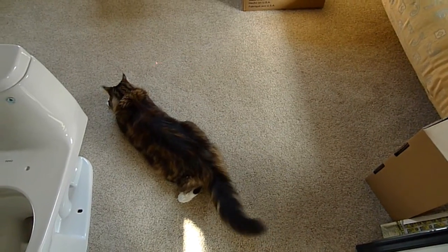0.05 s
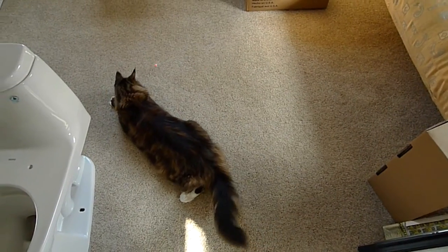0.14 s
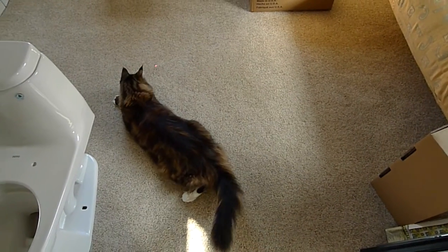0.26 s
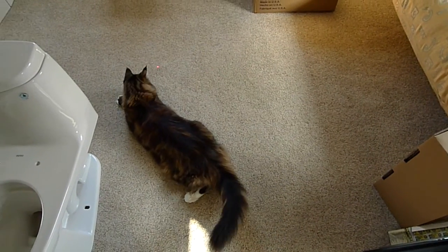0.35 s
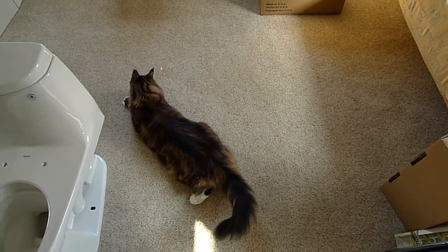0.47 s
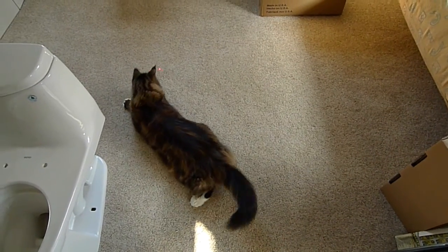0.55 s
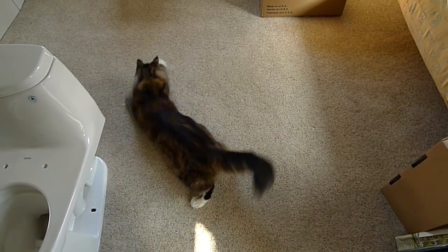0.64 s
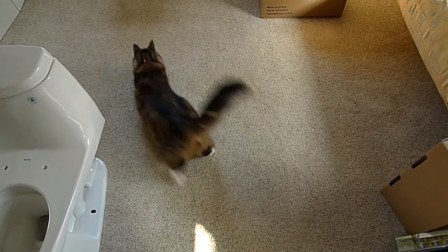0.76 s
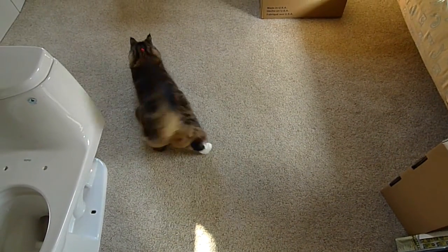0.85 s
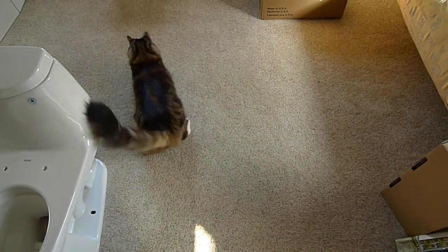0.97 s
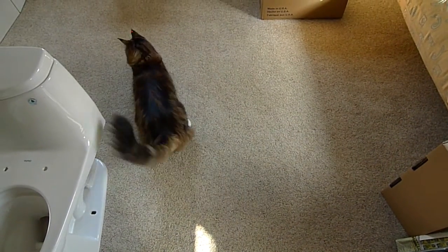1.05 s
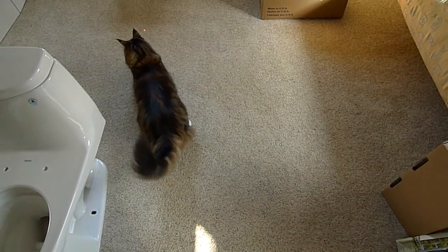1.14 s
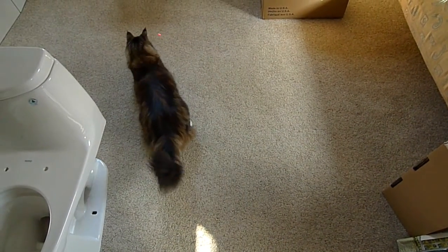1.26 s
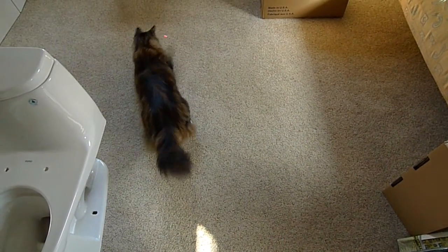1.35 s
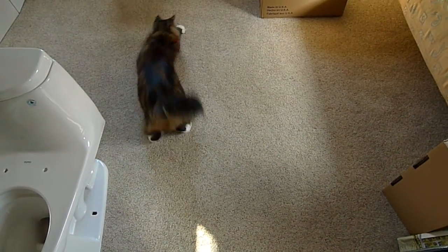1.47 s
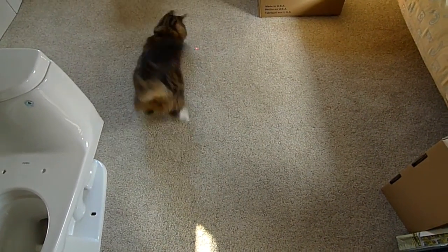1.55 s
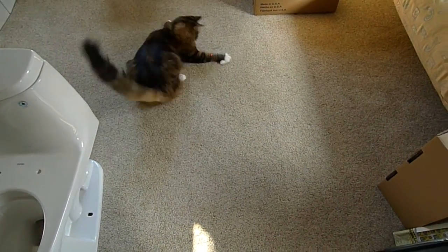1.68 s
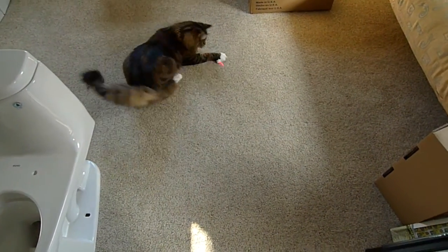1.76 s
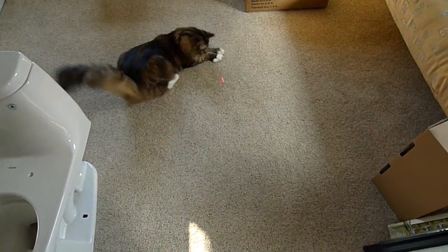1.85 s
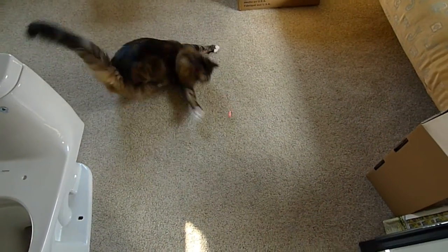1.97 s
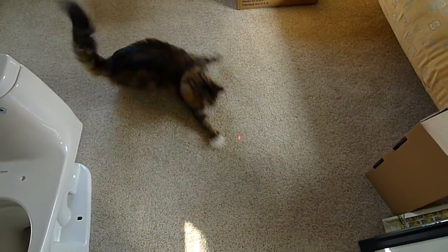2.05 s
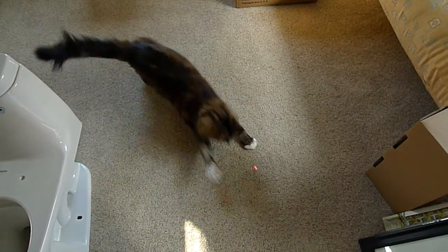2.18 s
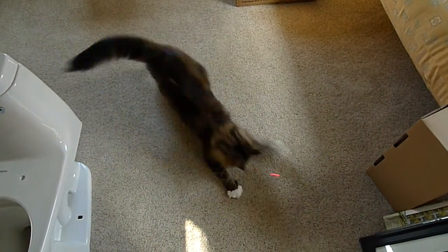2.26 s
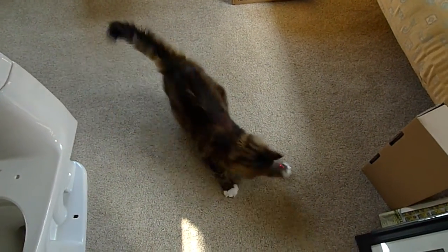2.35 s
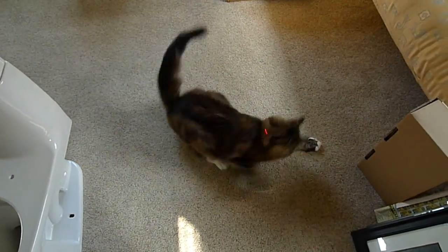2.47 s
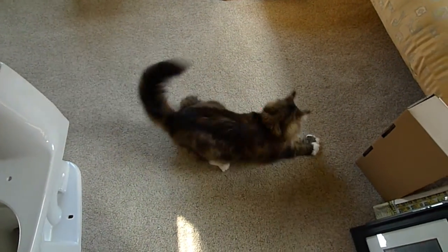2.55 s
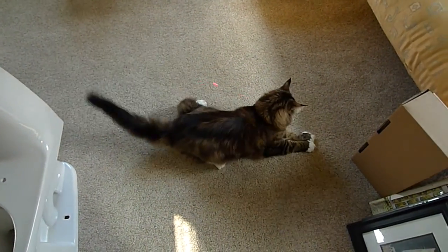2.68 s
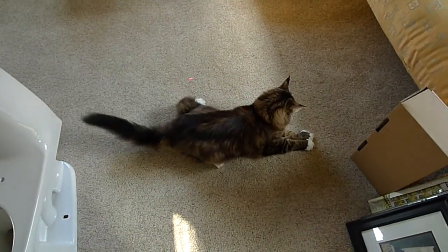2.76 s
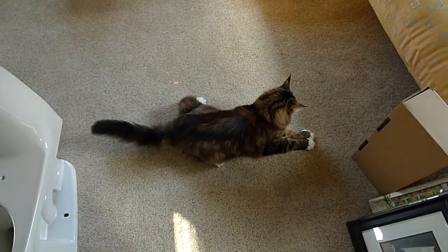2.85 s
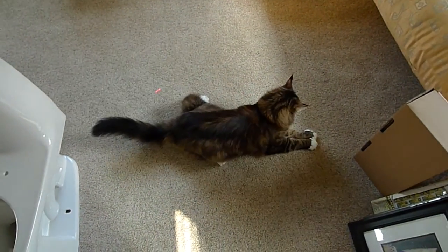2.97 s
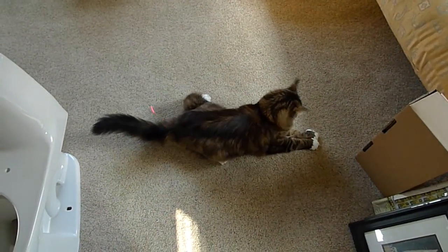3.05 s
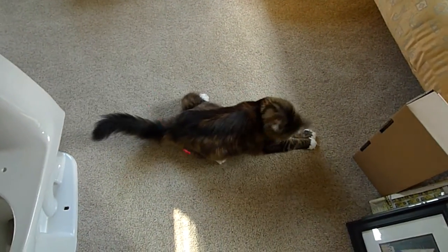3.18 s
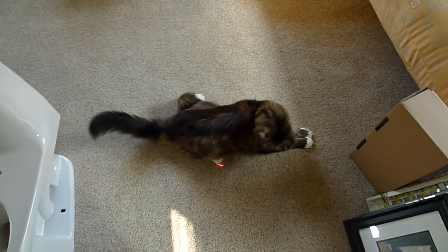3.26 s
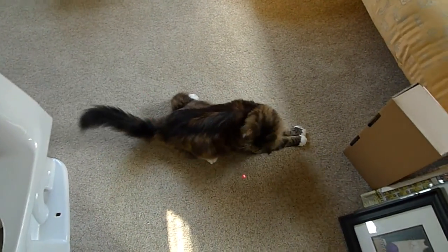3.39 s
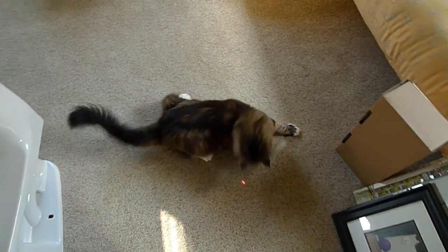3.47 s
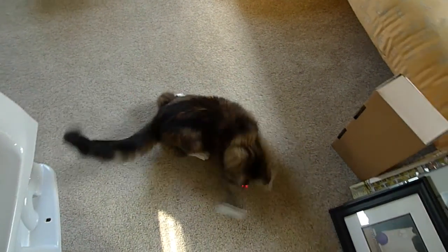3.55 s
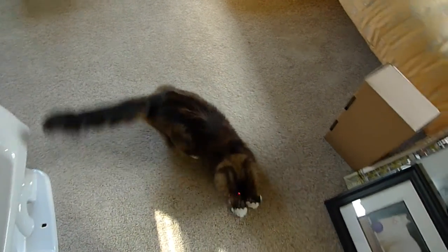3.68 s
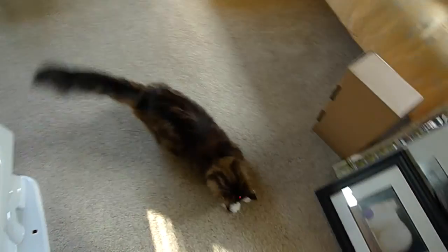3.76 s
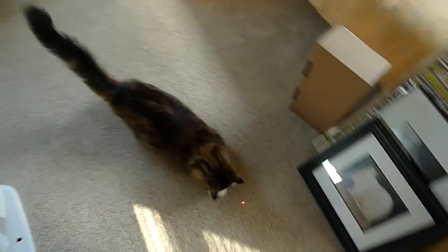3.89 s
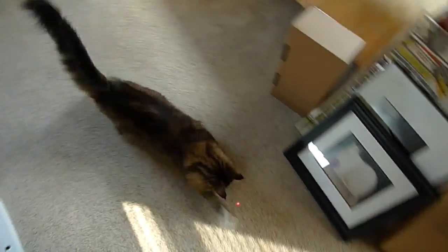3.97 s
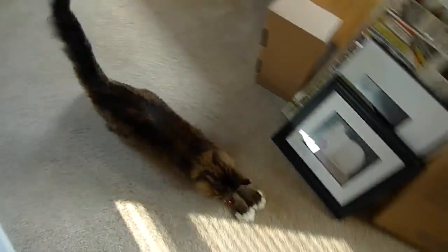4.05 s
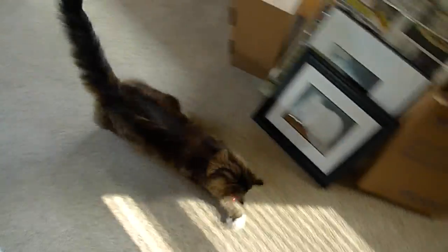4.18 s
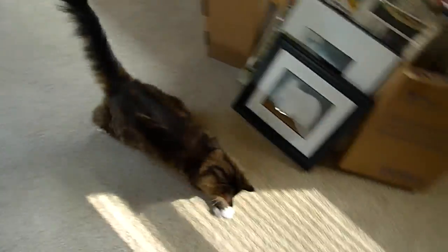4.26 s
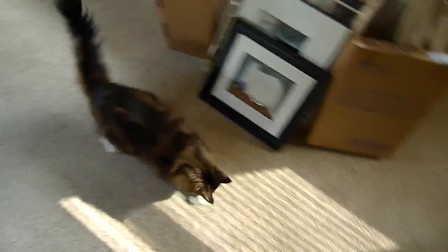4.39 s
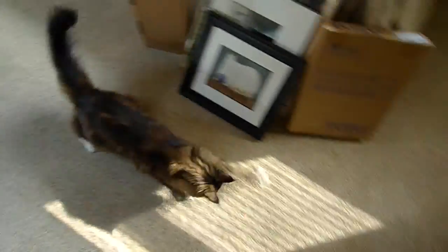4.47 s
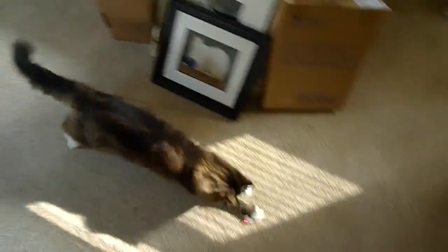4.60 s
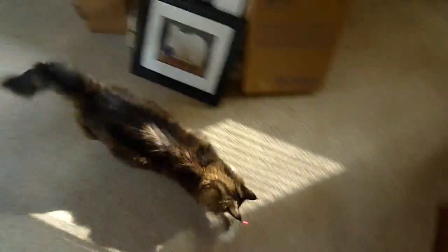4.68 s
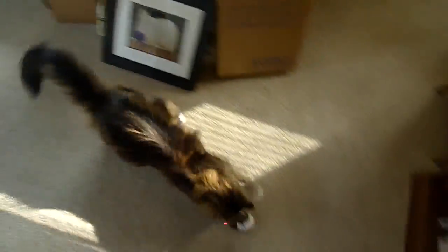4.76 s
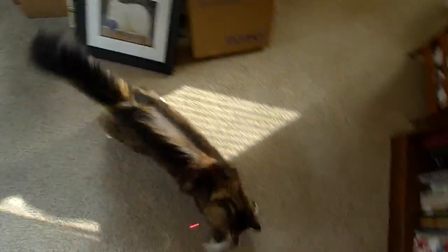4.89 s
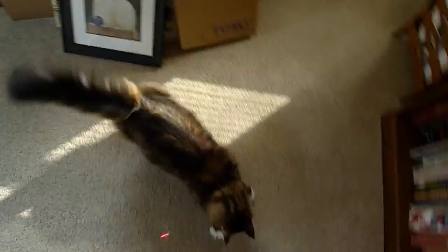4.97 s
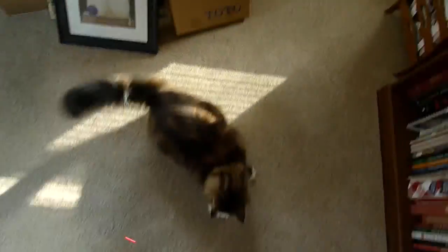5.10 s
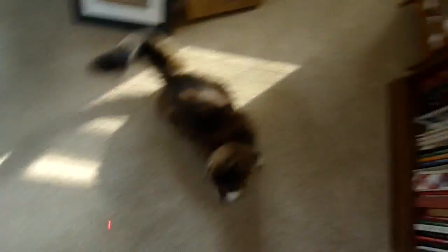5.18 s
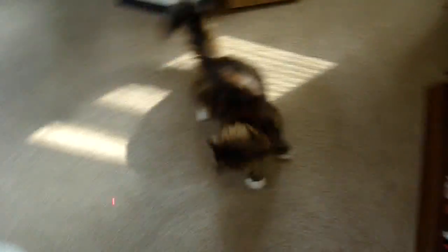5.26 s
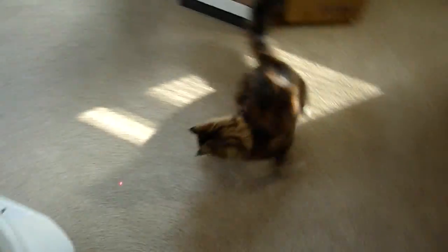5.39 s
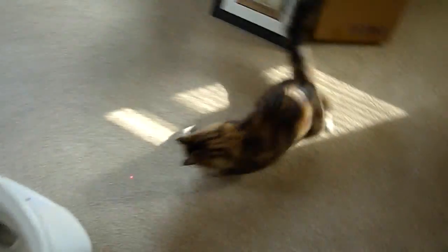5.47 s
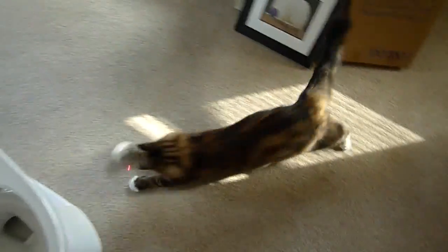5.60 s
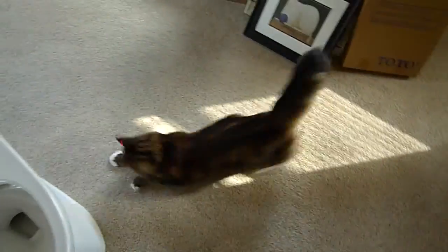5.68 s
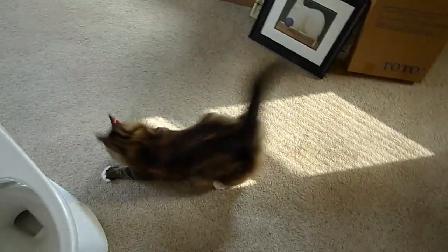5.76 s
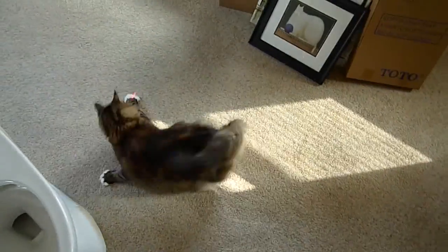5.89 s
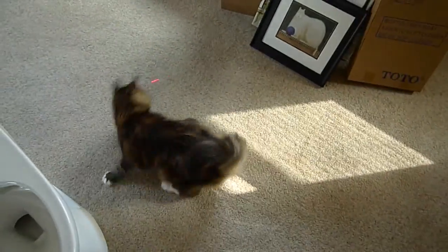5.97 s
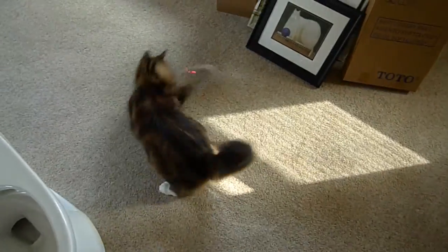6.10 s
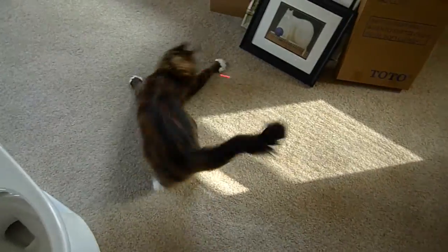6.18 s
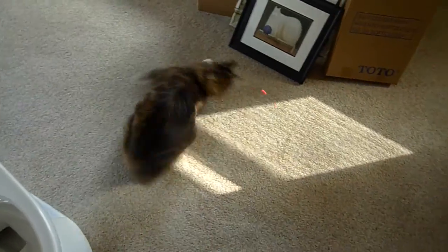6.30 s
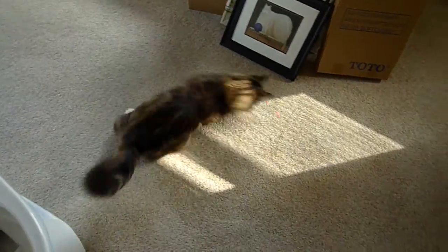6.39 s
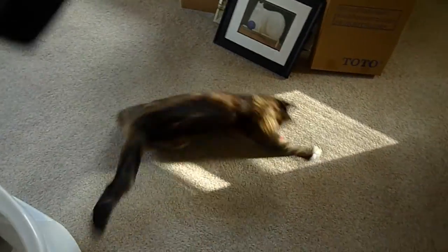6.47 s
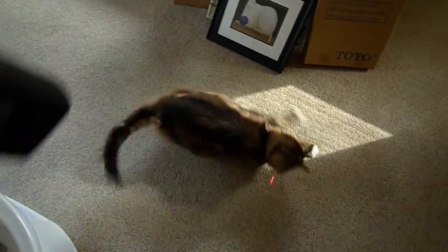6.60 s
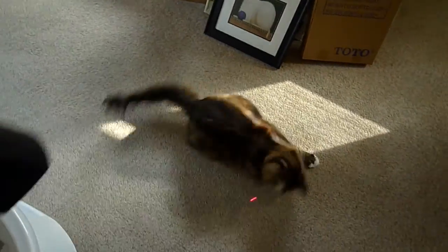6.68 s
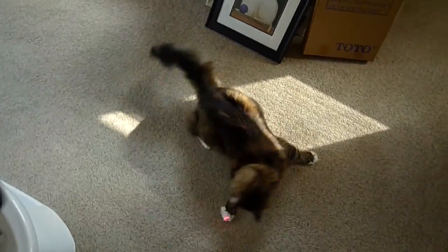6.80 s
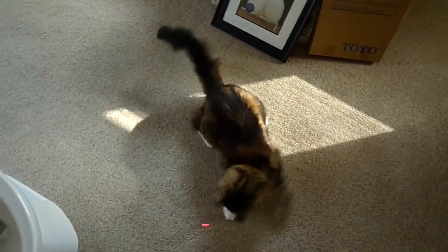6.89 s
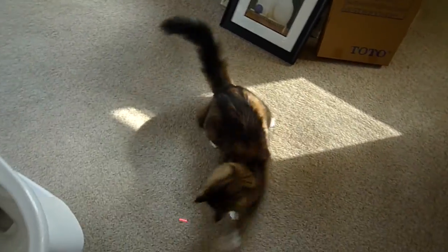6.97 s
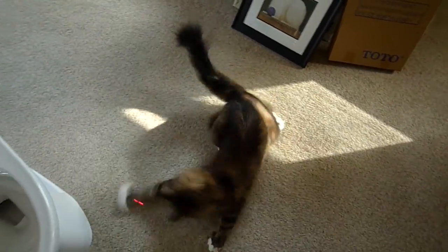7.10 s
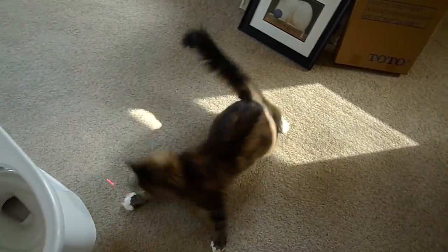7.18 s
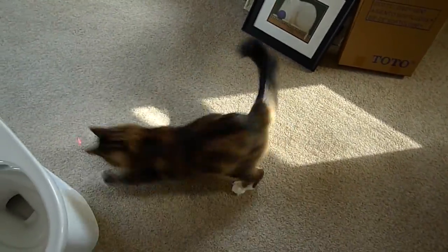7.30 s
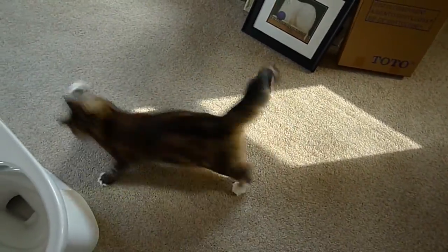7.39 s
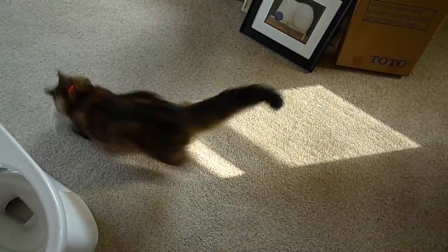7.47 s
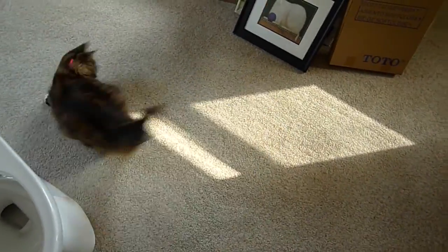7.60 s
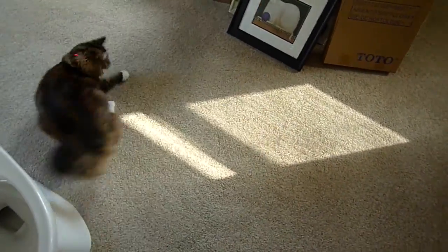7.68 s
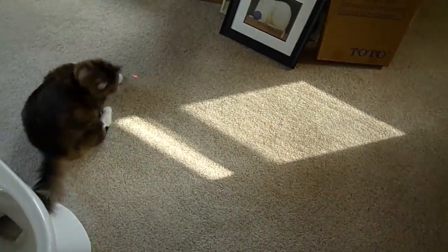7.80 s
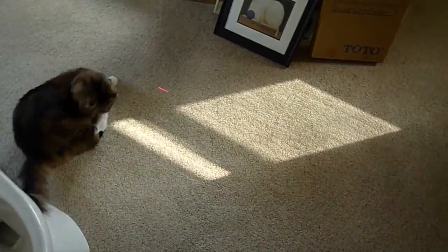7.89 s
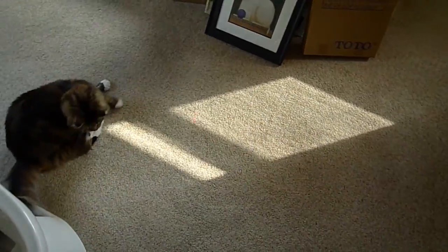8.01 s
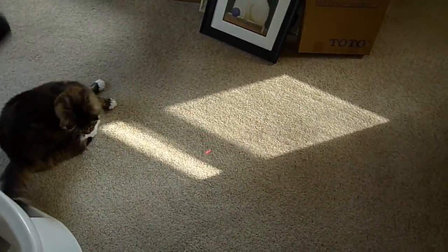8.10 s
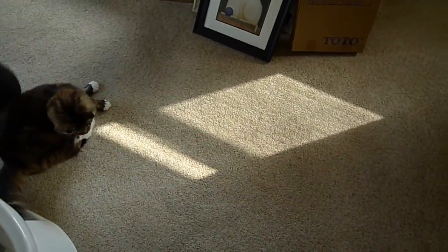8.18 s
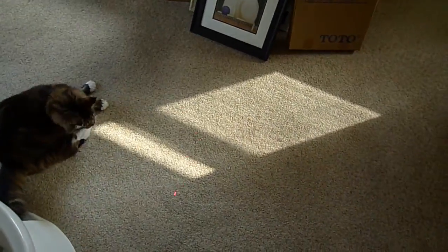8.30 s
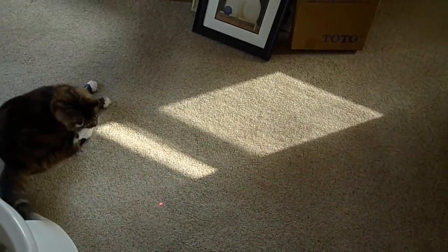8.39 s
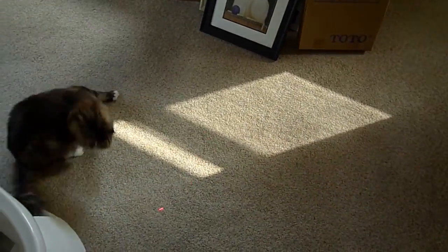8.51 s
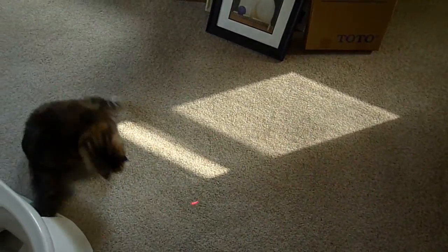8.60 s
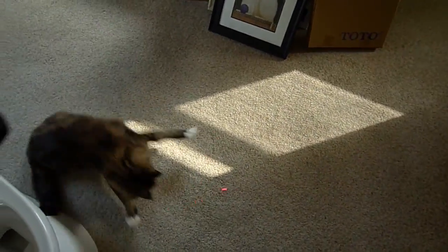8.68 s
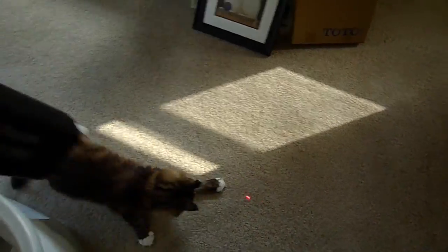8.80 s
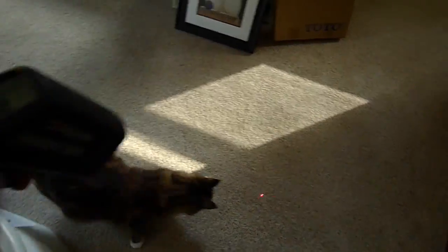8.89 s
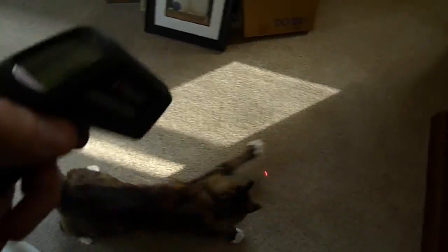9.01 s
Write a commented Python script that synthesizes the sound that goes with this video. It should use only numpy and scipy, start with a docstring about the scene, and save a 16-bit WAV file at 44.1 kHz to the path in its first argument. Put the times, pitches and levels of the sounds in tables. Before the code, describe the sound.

In a quiet furnished room, a large cat pounces about on carpet: blunt low thumps, plucking claws, brief rasps, soft brushing, low hiss.

```python
"""A soft, hissing room hush with a faint whine comes first, then brushing sounds and soft thuds:
a heavy cat chases a light spot over a carpeted wooden floor in a small furnished room.
Paws are blunt swings that set boards and joists ringing; claws snap from taut loops and rasp on.
Fur and pads scuff the pile as showers of tiny grains, and scattered echoes answer each blow.
Filtered noise makes the room air and the hiss of a small handheld camera; sines make its whine."""
import sys
import numpy as np
from scipy import signal
from scipy.fft import rfft, irfft, next_fast_len
from scipy.io import wavfile
from scipy.ndimage import uniform_filter1d

SR = 44100
rng = np.random.default_rng(int(sys.argv[2]) if len(sys.argv) > 2 else 0)


def bounce(signal):
    """Save signal as a 16-bit WAV file at the path given by the first command-line argument."""
    frames = np.transpose(np.atleast_2d(signal))
    limited = np.clip(frames, -1, 1)
    pcm = np.round(limited * 32767).astype(np.int16)
    wavfile.write(sys.argv[1], SR, pcm)


N = 399099
TIME = np.arange(N) / SR
RING = TIME[:32768]  # time axis of one contact, in seconds
LEAD_S = .025  # the blow or snap is centred this long after its piece of sound starts
ROOM_T60_LOW, ROOM_T60_HIGH = 0.5, 0.65  # seconds for the dull and bright room tails to fall 60 dB

# Paws landing on the floor. Each row: time in seconds, level of the blow in dB, pitch of the thud in Hz,
# freedom of the boards to ring in dB (a planted paw damps them).
PAW_FALLS = [(0.778, -36.5, 223, 4), (0.851, -36, 310, -1), (0.866, -33.5, 237, -5.5),
             (0.904, -38.5, 221, -14), (0.954, -35, 239, 0), (1.554, -35.5, 226, -3),
             (1.657, -31.5, 236, -0.5), (1.729, -31.5, 232, 0), (1.978, -36, 233, -3), (2.192, -34, 314, 0),
             (2.286, -23.5, 318, -1), (2.337, -18.5, 290, -6.5), (2.346, -22, 213, -14),
             (2.361, -23, 214, -12), (2.372, -26, 215, -14), (2.397, -25.5, 175, -7),
             (2.42, -18.5, 332, -8), (2.429, -24, 320, -13), (2.449, -29, 363, -9), (2.599, -41, 215, 1),
             (3.564, -44.5, 397, 5.5), (3.689, -21, 309, -1.5), (3.716, -32.5, 217, -3),
             (3.76, -46, 198, -5), (4.139, -28, 275, 1.5), (4.181, -31, 223, -2), (4.588, -30.5, 300, -7),
             (4.639, -28, 296, -6), (4.704, -30, 290, -11), (4.83, -25.5, 320, -7), (4.865, -35, 252, -10),
             (4.929, -32, 219, 1), (4.974, -35, 141, -1), (5.001, -32, 267, -1), (5.101, -35.5, 244, -6),
             (5.701, -29.5, 244, -5), (5.742, -30, 185, -10.5), (5.857, -21.5, 213, -7.5),
             (5.869, -21, 203, -13), (5.902, -27.5, 190, -6), (6.395, -34, 290, 1.5), (6.569, -29, 226, -9),
             (6.602, -24, 300, -1.5), (6.636, -32, 190, -2), (6.693, -36, 268, 6),
             (6.856, -30.5, 204, -3.5), (7.138, -19.5, 243, -3.5), (7.164, -24.5, 257, -4),
             (7.171, -36.5, 273, -16), (7.394, -24, 198, -2), (7.418, -29, 235, 3),
             (7.452, -25.5, 288, -5.5), (7.48, -26, 305, -20), (7.535, -27.5, 211, -1.5),
             (7.633, -31.5, 374, 1.5), (7.641, -21.5, 200, -2.5), (7.656, -31, 300, -4),
             (7.67, -30, 252, -14), (7.735, -25, 236, -3), (7.85, -35, 320, -1.5), (8.86, -19.5, 287, -6.5),
             (8.877, -31, 205, -6), (8.885, -23, 239, -3), (8.9, -30, 267, -6), (8.929, -31, 233, -8),
             (9.01, -29, 287, 2)]
# Claws plucking the carpet. Each row: time in seconds, snap in dB and pop of the backing in dB (both before
# the shared trims in claws), treble share of the snap in dB, pitch of the pop in Hz, twang of the loop in Hz,
# tear of the other claws in dB over the snap (before trims), freedom of the backing to ring in dB,
# rasp in dB (before its low-pass), pitch of the rasp in Hz.
CLAW_PLUCKS = [(1.455, -37.5, -31.5, -14.5, 318, 1370, 0.5, 2, -46.5, 2520),
               (1.715, -50, -36, -9, 330, 935, -2, -2, -59, 2450),
               (1.718, -36, -35, -16.5, 300, 940, -0.5, -2.5, -43.5, 2430),
               (1.807, -50, -43, -8, 380, 1500, -4, -1, -57, 2700),
               (2.019, -38, -32.5, -11, 500, 1570, -1, -0.5, -45, 2740),
               (2.337, -60, -40.5, -14, 620, 1300, -6, 3, -68, 2500),
               (2.42, -38.5, -32, -8, 296, 1290, -0.5, 4, -50, 2920),
               (2.562, -45.5, -34.5, -13, 358, 1640, 3, 0, -51, 2640),
               (3.565, -50.5, -65, -4.5, 373, 1400, -3, 1, -57, 2800),
               (4.048, -33.5, -26, -12.5, 373, 1540, -3.5, 0, -60, 2800),
               (4.131, -36.5, -32, -8.5, 354, 1790, -1, 2, -55, 2780),
               (4.165, -51.5, -32.5, -16, 354, 1400, -8, -6, -62, 2600),
               (4.257, -39, -24, -4, 270, 1090, 3, 0.5, -60, 3330),
               (4.265, -44, -37.5, -4, 400, 1300, -4, -10, -54, 3250),
               (4.481, -49.5, -51, -11.5, 373, 1500, -2, 6.5, -57, 2600),
               (4.585, -46.5, -43, -9, 293, 1250, -0.5, -8, -58, 2590),
               (4.638, -54, -50, -10.5, 330, 1400, 1, -3, -60, 2600),
               (4.696, -41.5, -30, -11, 322, 1500, 0.5, -4.5, -64, 2780),
               (4.777, -32.5, -24, -14.5, 407, 1230, 0, 1.5, -46.5, 3000),
               (4.95, -44.5, -37, -12.5, 363, 1720, -2, -0.5, -69, 2400),
               (5.241, -40.5, -49, -10, 420, 1230, -6.5, -1, -51, 2580),
               (5.419, -43, -37.5, -8, 404, 1400, -20, -8, -59, 3000),
               (5.428, -33.5, -22.5, -8.5, 327, 1370, -5.5, -8, -53.5, 3230),
               (5.482, -47.5, -37, -18, 484, 1000, -2.5, -14, -70, 2500),
               (5.869, -31.5, -28, -16, 286, 1140, -7, -6, -44.5, 2630),
               (5.882, -44, -36.5, -21, 360, 1310, -2, -2.5, -53, 2580),
               (6.162, -47, -40, -19, 473, 1200, -9, -7, -58, 2340),
               (6.183, -27, -26, -15, 455, 1080, -7.5, -0.5, -46, 3130),
               (6.193, -31, -31, -12.5, 486, 1150, -4, 1, -43.5, 2400),
               (6.215, -44, -38, -20, 474, 1110, -9, -10, -61, 2400),
               (6.237, -42, -34, -17, 446, 1300, -10, -6, -59, 2400),
               (6.469, -39.5, -29.5, -12.5, 374, 2020, 4, 2.5, -45, 2750),
               (6.761, -32.5, -25.5, -15.5, 326, 940, 2.5, 1, -54, 2820),
               (7.124, -52, -32, -14, 277, 1500, -5, -5, -68, 2600),
               (7.387, -34.5, -25.5, -7.5, 302, 1090, -5, 1.5, -44, 3180),
               (7.412, -41.5, -38, -20, 332, 1110, 2.5, -1, -59, 2500),
               (7.631, -52, -37, -13, 483, 1100, -3, 3, -66, 2500),
               (7.731, -41, -31.5, -8.5, 417, 1780, 4, 0, -45, 2500),
               (8.615, -37.5, -35, -13.5, 465, 1600, -1, 2.5, -47, 2670),
               (8.724, -52, -58, -10, 420, 1400, -11, -2, -68, 2500),
               (8.856, -53, -36.5, -33, 490, 990, -3, 3.5, -69, 2400),
               (8.896, -52, -37, -31, 576, 1010, -13, -1, -68, 2400)]
# Colour of rubbed carpet pile. Each row: frequency in Hz, level in dB.
RUBBED_PILE = [(120, 4), (300, 10), (500, 8), (800, 2), (1400, -2.5), (2200, -7), (3200, -12), (4000, -26),
               (7000, -45.5)]


def undb(db):
    """Turn decibels into a gain."""
    return 10 ** (np.asarray(db) / 20)


def unit(x):
    """Scale to an average (rms) level of 1."""
    return x / np.sqrt(np.mean(x ** 2))


def loudest(x, size):
    """Scale so that the loudest stretch of size samples has rms 1."""
    return x / np.sqrt(uniform_filter1d(x ** 2, size).max())


def add(out, s, x):
    """Mix x into out from time s (seconds) on."""
    i = max(int(s * SR), 0)
    out[i:i + len(x)] += x[:max(N - i, 0)]


def colour(x, points):
    """Filter through (Hz, dB) points without any sound before the input (minimum phase)."""
    hz, db = np.transpose(points)
    size = next_fast_len(len(x) // 2 + 4096) * 2
    freqs = np.maximum(np.arange(size // 2 + 1) * SR / size, 1)
    curve_db = np.interp(np.log(freqs), np.log(hz), db)
    # folding the cepstrum forward in time makes the filter respond only after its input
    cepstrum = irfft(np.log(undb(curve_db)))
    cepstrum[1:size // 2] *= 2
    cepstrum[size // 2 + 1:] = 0
    return irfft(rfft(x, size) * np.exp(rfft(cepstrum)))[:len(x)]


def resonate(x, modes):
    """Ring a set of resonances, each given as (Hz, width in Hz, dB), and sum them."""
    total = 0
    for hz, width, db in modes:
        b, a = signal.iirpeak(hz, hz / width, fs=SR)
        total = total + undb(db) * signal.lfilter(b, a, x)
    return total


def cut(x, hz, kind, order):
    """Smooth low-pass or high-pass filter."""
    return signal.sosfilt(signal.butter(order, hz, kind, fs=SR, output="sos"), x)


def fade(t60):
    """Decay by 60 dB in t60 seconds."""
    return np.exp(-np.log(1000) * RING / t60)


def echoes(early_t60, late_t60, late_db, gap_s, first_per_s=500):
    """Reflections from the floor: single ones off the furniture thicken into the room's tail."""
    # share of samples that hold a reflection grows with time
    share = np.minimum(first_per_s / SR * (1 + (RING / .02) ** 2), 1)
    count = np.floor(np.cumsum(2 * share * rng.random(len(RING))))
    # rarer reflections are stronger
    reflections = (np.diff(count, prepend=0) > 0) / np.sqrt(share)
    signs = rng.choice([-1, 1], len(RING))
    arrival = 1 - np.exp(-(RING / gap_s) ** 4)
    decay = np.hypot(fade(early_t60), undb(late_db) * fade(late_t60))
    return reflections * signs * arrival * decay


def pad(x, hz, breadth, soft):
    """A soft contact pushes for about half a cycle of hz, so it excites little above that."""
    return cut(resonate(x, [(hz, breadth * hz, 0)]), soft * hz, "lowpass", order=5)


def swing(hz, cycles, after_s):
    """The floor gives and springs back in one short, smooth swing centred after_s after the start."""
    turn = (RING - after_s) * hz
    return np.exp(-(turn / cycles) ** 2) * np.sin(-2 * np.pi * turn)


def spot(s):
    """Answer of the room, of the joists and their lean, all in dB, gliding as the cat moves about."""
    # How the floor and room answer. Each row: time in seconds, room in dB over the blow (before each
    # sound's own trims), joists in dB over the blow, lean of the joists to their upper modes in dB.
    answers = [(0.801, -10, -15, -7), (1.701, -4, -12, -5), (2.4, -6.5, -18, -3), (3.701, -7, -14, 4),
               (4.1, -10.5, -13, 1), (4.7, -7, -13, -20.5), (5.0, -9.5, -17.5, -15.5),
               (5.798, -1.5, -12, 0), (6.6, -9.5, -18, -12), (7.2, -4.5, -21, -4.5), (7.7, -8.5, -24, -20),
               (8.9, -6.5, -20, -10)]
    times, *columns = np.transpose(answers)
    return [np.interp(s, times, column) for column in columns]


def even(x, share=0.55):
    """Level the chance swells of a ring, so that it dies away more steadily."""
    power = np.abs(signal.hilbert(x)) ** 2
    floor = 1e-9 * np.max(x ** 2)
    fast = uniform_filter1d(power, size=200).clip(0) + floor
    slow = uniform_filter1d(power, size=1500).clip(0) + floor
    return x * np.minimum(slow / fast, 2) ** (share / 2)


def twang(x, hz, width_hz=170, lift_db=-1):
    """The taut loop lifts its own pitch out of a snap."""
    return x + resonate(x, [(hz, width_hz, lift_db)])


def background():
    """Room air and camera hiss are one coloured noise with wavering lows; steady sines whine faintly."""
    # Colour of the still room. Each row: frequency in Hz, relative level in dB.
    quiet = [(35, -18), (65, -5.5), (95, -6.5), (125, 1), (180, -0.5), (205, -2.5), (250, 2), (320, -5),
             (600, -3.5), (1030, -9), (1110, -4), (1200, -11), (3200, -15.5), (4000, -23.5), (7000, -25.5),
             (8200, -34.5)]
    # Faint whine of the camera. Each row: frequency in Hz, rms level in dB.
    whine_tones = [(4388, -83), (6222, -93)]
    quiet_db = -53.5  # rms level of the noise before its lows waver
    air = unit(colour(rng.standard_normal(N), quiet)) * undb(quiet_db)
    low = cut(air, 1700, "lowpass", order=1)
    waver_db = np.interp(TIME, np.linspace(0, TIME[-1], num=110), .7 * rng.standard_normal(110))
    whine = sum(np.sqrt(2) * undb(db) * np.sin(2 * np.pi * hz * TIME) for hz, db in whine_tones)
    return air + low * (undb(waver_db) - 1) + whine


def scuffs():
    """Tufts of the pile flick past fur and pads as dense tiny grains; each slide swells and dies."""
    # The body brushing the pile as the cat twists round.
    # Each row: time of the middle in seconds, level in dB, half length in seconds.
    twists = [(0.36, -55, 0.074), (0.67, -55.5, 0.1), (0.81, -50, 0.047), (0.96, -51, 0.053),
              (1.558, -47, 0.02), (2.265, -45, 0.033), (3.19, -56, 0.076), (3.458, -57, 0.053),
              (4.54, -46, 0.038), (5.04, -45, 0.021), (5.21, -49.5, 0.12), (5.81, -47.5, 0.36),
              (6.44, -46.5, 0.054), (7.135, -51, 0.035), (7.288, -49, 0.069), (7.71, -45, 0.043),
              (7.867, -46.5, 0.039), (8.79, -53, 0.056)]
    grains_per_s, spread_db = 1300, 2
    sizes = undb(spread_db * np.minimum(rng.exponential(size=N), 4))
    grains = (rng.random(N) < grains_per_s / SR) * rng.choice([-1, 1], N) * sizes

    # light contacts slide a little louder than firm ones
    slide_db_per_db, usual_paw_db, usual_snap_db = -0.05, -30.5, -41
    slides = list(twists)
    # every paw skids as it lands
    for s, db, *_ in PAW_FALLS:
        slides.append((s + .002, -54.5 + slide_db_per_db * (db - usual_paw_db), 0.055))
    # every claw is raked through the pile just before it plucks
    for s, db, *_ in CLAW_PLUCKS:
        slides.append((s - 0.0081, -51 + slide_db_per_db * (db - usual_snap_db), 0.028))

    power = np.zeros(N)
    for middle_s, db, half_s in slides:
        distance = np.minimum(((TIME - middle_s) / half_s) ** 2, 20)
        power += undb(db) ** 2 * np.exp(-2 * distance)
    return unit(colour(grains, RUBBED_PILE)) * np.sqrt(power)


def paws():
    """The weight gives one blunt swing of the floor, then boards, room and joists ring on."""
    # Resonances of the boards and the room over them. Each row: frequency in Hz, width in Hz, level in dB.
    boards = [(152.7, 13, 5), (193.8, 18, 4), (242, 27, -2.5), (309, 37, -5), (347.7, 11, 0.5),
              (432.4, 12, -1), (482, 22, -4.5)]
    # Resonances of the joists. Each row: frequency in Hz, width in Hz, level in dB.
    joists = [(46.4, 17, -3.5), (69.5, 190, -24.5), (101, 57, -12)]
    rebound_db, weight_db, tail_db, tone_db, brush_db = -11, -7, -10, -7, -19
    out = np.zeros(N)
    for s, blow_db, hz, free_db in PAW_FALLS:
        room_db, joist_db, lean_db = spot(s)
        ring_db = blow_db + room_db + free_db

        # the blow, the slower weight behind it and a rebound one cycle later
        push = swing(hz, cycles=0.97, after_s=LEAD_S)
        weight = undb(weight_db) * swing(0.7 * hz, cycles=0.9, after_s=LEAD_S)
        rebound = undb(rebound_db) * swing(hz, cycles=0.77, after_s=LEAD_S + 1 / hz)
        blow = cut(push + weight + rebound, 125, "highpass", order=3)
        add(out, s - LEAD_S, undb(blow_db) * loudest(blow, size=200))

        # the board under the paw and the first reflections keep the thud's pitch
        modes = list(boards) + [(1.06 * hz, 45, -4)]
        early = resonate(echoes(0.14, 0.34, late_db=-10.5, gap_s=0.0023), modes)
        early = pad(early, hz, breadth=0.69, soft=1.524)
        # a lower-pitched part comes late and stays
        late = resonate(echoes(0.48, ROOM_T60_LOW, late_db=-4, gap_s=0.024), boards)
        late = pad(late, 0.82 * hz, breadth=0.66, soft=1.71)
        ring = even(loudest(early, size=1600) + undb(tail_db) * loudest(late, size=2600))
        ring = cut(ring, 115, "highpass", order=4)
        add(out, s, undb(ring_db) * loudest(ring, size=1600))

        # struck directly, the boards nearest the thud's pitch hum on cleanly, each slightly detuned
        tuned = [(f * (1 + 0.028 * rng.standard_normal()), 0.67 * width, db) for f, width, db in boards]
        tone = resonate(signal.unit_impulse(len(RING)), tuned)
        tone = pad(tone, 1.024 * hz, breadth=.35, soft=2.1)
        add(out, s, undb(ring_db + tone_db) * loudest(tone, size=1600))

        # the joists sag and ring low
        sag = resonate(echoes(0.44, 0.89, late_db=-2.0, gap_s=0.0007), joists)
        sag = cut(sag, 180, "lowpass", order=3)
        sag = colour(sag, [(50, 0.0024), (95, lean_db)])
        sag = cut(sag, 110, "highpass", order=3)
        add(out, s, undb(blow_db + joist_db + free_db / 2) * loudest(sag, size=2600))

        # the pile crushes dully under the pad
        brush = colour(echoes(0.036, ROOM_T60_HIGH, late_db=-15.0, gap_s=0.0011), RUBBED_PILE)
        brush = cut(brush, 1500, "lowpass", order=2)
        add(out, s - 1 / hz / 2, undb(blow_db + brush_db) * loudest(brush, size=600))
    return out


def claws():
    """A claw drags a loop taut and lets go: a snap, and the lifted backing pops down on the floor."""
    # Colour of a plucked loop. Each row: frequency in Hz, level in dB.
    pluck = [(300, -25), (550, -2.5), (850, -3), (1050, 1), (1350, 2.5), (1700, -1.5), (2400, -7.5),
             (2850, -8.5), (3400, -15), (4000, -24.5), (4700, -40), (8000, -44.5)]
    # Resonances of the lifted carpet backing. Each row: frequency in Hz, width in Hz, level in dB.
    backing = [(207, 160, 2), (321.5, 48, -3), (426, 27, -3.5), (494, 37, -5.5)]
    # trims shared by all plucks, in dB
    snap_db, tear_db, pop_db, boom_db, slap_db = 2, 2.0, 2, 0.5, -6
    drag_db, second_claw_db = -20, -5
    neutral_db = -8  # treble share at which a snap counts as neither bright nor dull
    out = np.zeros(N)
    for s, crack_db, backing_db, treble_db, hz, loop_hz, others_db, free_db, *_ in CLAW_PLUCKS:
        tilt_db = treble_db - neutral_db
        room_db = spot(s)[0]

        # fibres creak for a few milliseconds as the tension grows and slackens
        drag = rng.standard_normal(len(RING)) * np.exp(-np.abs(RING - LEAD_S) / 0.0024)
        release = signal.unit_impulse(len(RING), int(LEAD_S * SR))
        snap = twang(colour(release + undb(drag_db) * drag, pluck), loop_hz)
        snap = colour(snap, [(900, 0.011), (3200, 2.9 * tilt_db + 5.5), (4200, 2.9 * tilt_db + 4)])
        # the brighter the snap, the more the hard tip of the claw ticks on top
        snap = twang(snap, 3750, width_hz=500, lift_db=1.5 * tilt_db - 5)
        add(out, s - LEAD_S, undb(crack_db + snap_db) * loudest(snap, size=130))

        # the other claws of the paw tear too, with one delayed copy, and the room scatters them
        tear = echoes(0.24, ROOM_T60_HIGH, late_db=-9.5, gap_s=0.0032, first_per_s=900)
        tear = colour(tear, pluck)
        lag = int(rng.uniform(.0006, .003) * SR)
        second_claw = np.pad(tear, (lag, 0))[:-lag]
        tear = colour(tear + undb(second_claw_db) * second_claw, [(900, 0.005), (3200, tilt_db)])
        tear = twang(tear, loop_hz, width_hz=180, lift_db=-0.5)
        add(out, s, undb(crack_db + room_db + tear_db + others_db) * loudest(tear, size=1600))

        # the backing pops at its own pitch
        pop = np.cos(2 * np.pi * hz * RING) * fade(0.029)
        pop = cut(pop, 1200, "lowpass", order=2)
        add(out, s, undb(backing_db + pop_db) * loudest(pop, size=260))

        # it slaps the floor with a lower swing
        slap_hz = .6 * hz
        slap = swing(slap_hz, cycles=0.95, after_s=LEAD_S + .5 / slap_hz)
        add(out, s - LEAD_S, undb(backing_db + slap_db) * loudest(slap, size=260))

        # backing and room boom on
        boom = resonate(echoes(0.11, 0.57, late_db=-8.0, gap_s=0.0026), backing)
        boom = even(pad(boom, hz, breadth=0.83, soft=3.15))
        boom = cut(boom, 0.55 * hz, "highpass", order=3)
        add(out, s, undb(backing_db + room_db + boom_db + free_db) * loudest(boom, size=1500))
    return out


def rasps():
    """The claw rips on through the fibres in a quick run of bright slips that dies away."""
    slips_per_s, scatter_db, rise_s, rasp_t60 = 430, 5.0, 0.00089, 0.036
    width_hz, wet_db = 1500, -9
    out = np.zeros(N)
    for s, *_, rasp_db, hz in CLAW_PLUCKS:
        # uneven gaps and uneven strengths keep the run rough
        gaps = rng.uniform(.4, 1.6, size=120)
        strengths = undb(scatter_db * rng.standard_normal(size=120))
        places = np.minimum(np.cumsum(gaps) / slips_per_s * SR, len(RING) - 1).astype(int)
        slips = np.bincount(places, strengths, len(RING))
        slips = slips * (1 - np.exp(-RING / rise_s)) * fade(rasp_t60)
        reflections = echoes(0.21, ROOM_T60_HIGH, late_db=-4.5, gap_s=0.012)

        # the fibres' resonance is applied twice to slips and reflections alike
        fibre = [(hz, width_hz, 0)]
        direct = loudest(resonate(resonate(slips, fibre), fibre), size=700)
        room = loudest(resonate(resonate(reflections, fibre), fibre), size=700)
        rasp = cut(direct + undb(wet_db) * room, 1.17 * hz, "lowpass", order=9)
        add(out, s, undb(rasp_db) * rasp)
    return out


def scene():
    """The cat in the room, on one microphone."""
    return (background() + scuffs() + paws() + claws() + rasps())[None]


def record(dry):
    """The camera's narrow band: a steep low-pass leaves almost nothing above its top."""
    top_hz, ripple_db, rejection_db = 8150, .2, 80
    band = signal.ellip(10, ripple_db, rejection_db, top_hz, fs=SR, output="sos")
    return signal.sosfilt(band, dry)


dry = scene()
out = record(dry)
bounce(out)
```